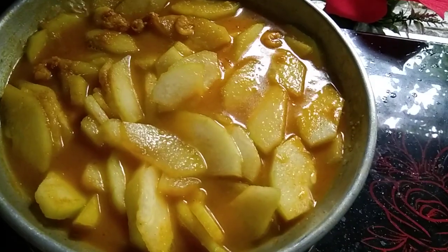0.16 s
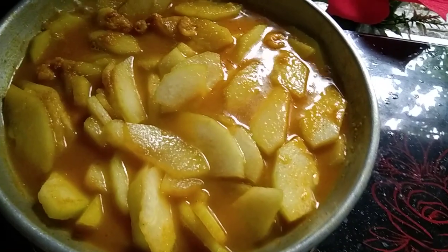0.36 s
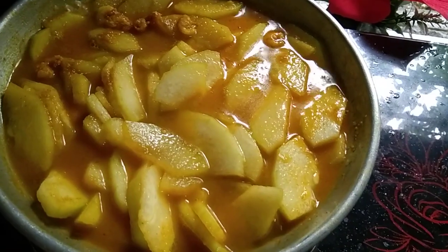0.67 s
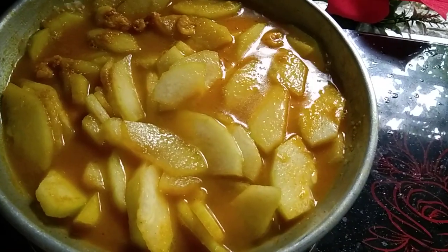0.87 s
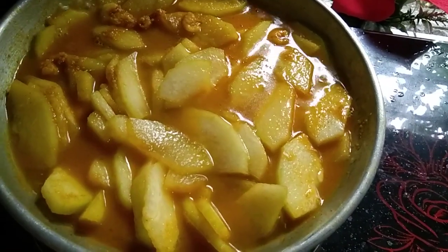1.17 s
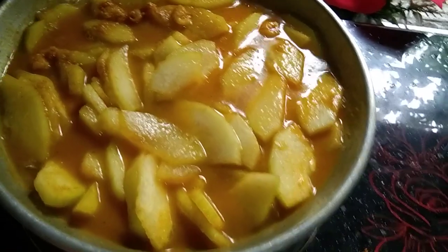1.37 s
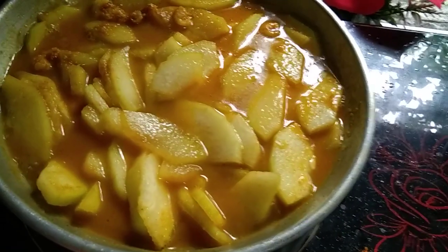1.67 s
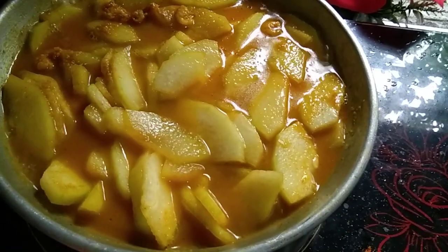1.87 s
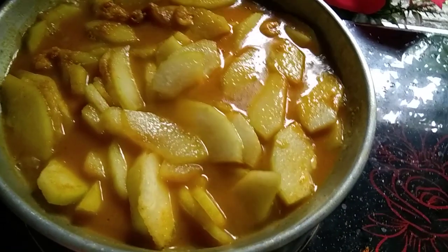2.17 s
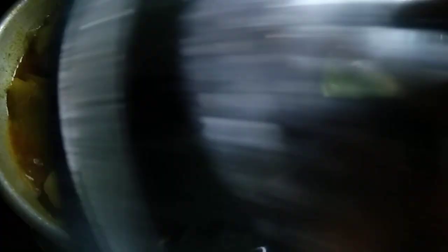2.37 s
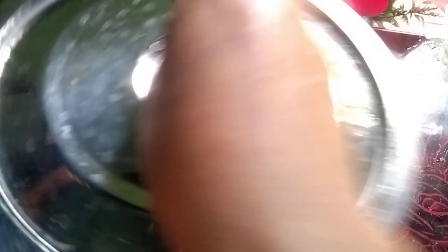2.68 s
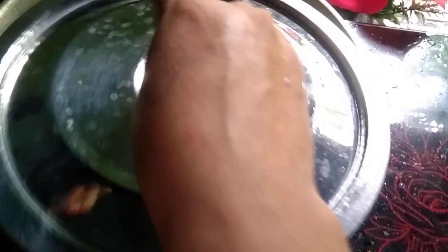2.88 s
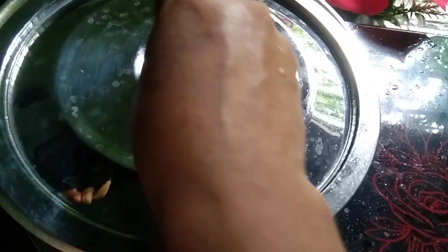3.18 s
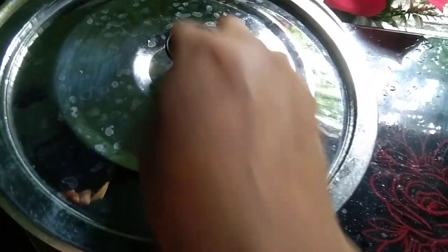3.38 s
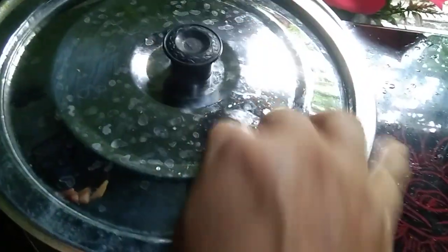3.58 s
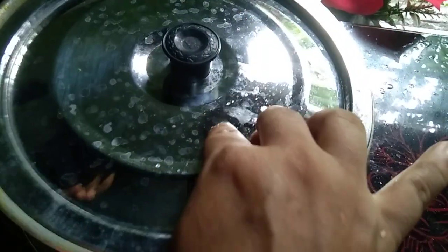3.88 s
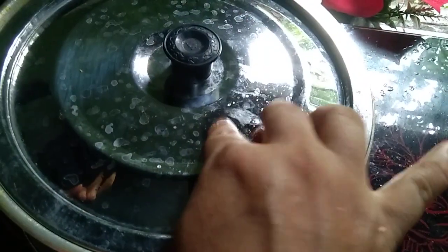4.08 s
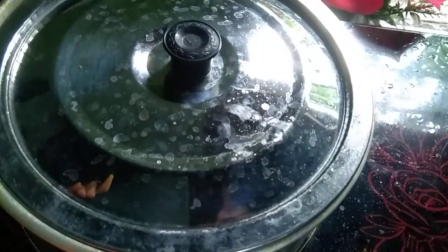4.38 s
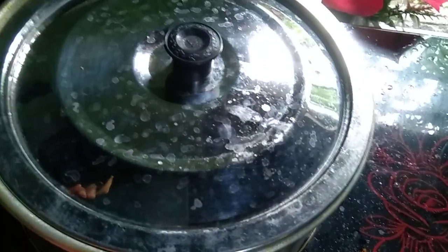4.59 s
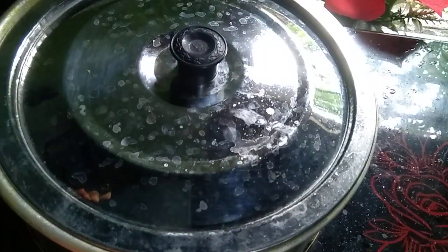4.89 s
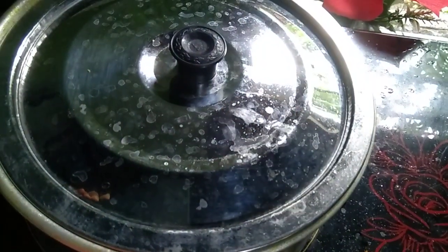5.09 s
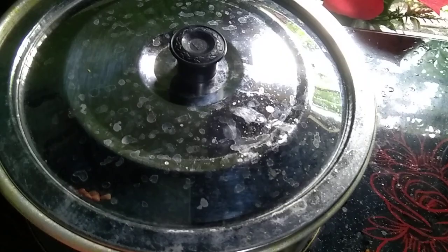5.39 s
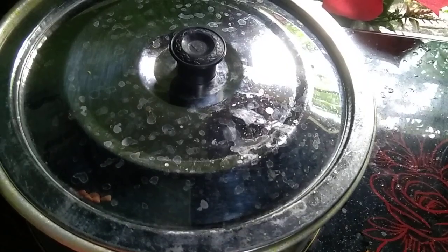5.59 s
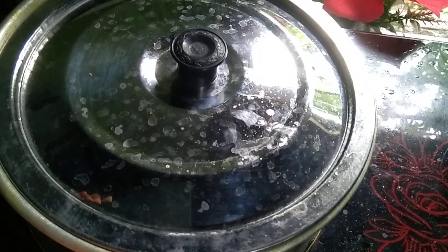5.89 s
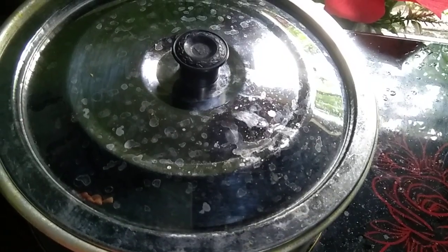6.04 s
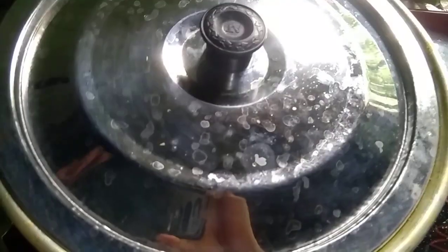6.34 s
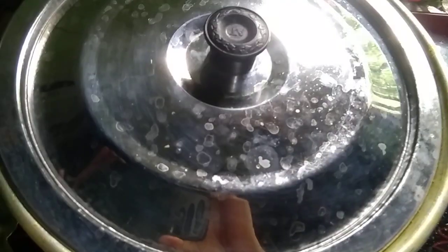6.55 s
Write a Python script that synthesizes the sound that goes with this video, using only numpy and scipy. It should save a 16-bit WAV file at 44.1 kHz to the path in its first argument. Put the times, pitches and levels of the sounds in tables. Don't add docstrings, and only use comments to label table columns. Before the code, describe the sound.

Curry simmers in an open steel pot, three spoon taps ring on the rim, then a glass lid clanks on and the bubbling turns hollow and quiet.

```python
import sys
import numpy as np
from scipy import signal
from scipy.fft import rfft, irfft
from scipy.io import wavfile
from scipy.ndimage import uniform_filter1d

SR = 44100
rng = np.random.default_rng(int(sys.argv[2]) if len(sys.argv) > 2 else 0)


def voltage_ratio(level):
    return 10 ** (np.asarray(level, float) / 20)


def transcribe(u):
    v = np.clip(np.atleast_2d(u).T, -1, 1)
    q = np.round(v * 32767).astype(np.int16)
    wavfile.write(sys.argv[1], SR, q)


N = 296352
T = np.arange(N) / SR

LID_MOVES_S = [
    2.9,
    4.0,
    6.26,
]
GATE_EDGES_HZ = [300, 1000, 3600, 6800, 15000]
# [f/Hz, width/Hz, level/dB]
OPEN_AIR = [(890, 69, -21.5), (2370, 520, 8), (4468, 200, 8), (5760, 306, 4.5), (6650, 160, -9.5),
            (7660, 890, -10), (8660, 82, -14), (9100, 170, -16.5), (10120, 470, -17)]
# [t/s, peak/dB, f/Hz]
POPS = [(0.2228, -34.5, 2500), (0.477, -25, 2900), (0.5242, -26.5, 2200), (0.6568, -35, 1220),
        (0.722, -35.5, 2360), (1.092, -25, 2600), (1.149, -32.5, 2100), (1.25, -37.5, 1960),
        (1.272, -36.5, 1980), (1.325, -43, 1360), (1.3585, -26.5, 2500), (1.51, -25, 3110),
        (1.682, -33, 2440), (1.9182, -33, 1790), (1.954, -36.5, 2590), (2.1623, -25, 2370),
        (2.2018, -35, 1820), (2.3164, -20, 2370), (2.39, -41.5, 3510), (2.56, -43.5, 3130),
        (2.7394, -37, 2690), (2.785, -40, 2050), (2.8587, -10, 2170)]
# [t/s, peak/dB, f/Hz]
SPITS = [(.035, -40, 6130), (0.107, -34, 6570), (0.135, -22, 7250), (0.2362, -23.5, 6960),
         (.505, -25, 6800), (.528, -30, 7100), (.56, -35, 6800), (0.641, -30.5, 9000), (0.734, -27, 7740),
         (.747, -33, 6500), (0.979, -23, 7560), (1.1376, -25.5, 7660), (1.1721, -44, 7700),
         (1.2284, -42, 5660), (1.254, -39.5, 5670), (1.2913, -53, 5900), (1.348, -36, 7700),
         (1.396, -45, 7900), (1.42, -33.5, 9100), (1.4509, -48, 4300), (1.3339, -28.5, 7660),
         (1.3885, -24, 7200), (1.4641, -29, 6650), (1.5194, -42.5, 5760), (1.5373, -25, 7900),
         (1.555, -44, 5900), (1.5602, -34.5, 8240), (1.6811, -27.5, 6650), (1.719, -28, 7250),
         (1.7462, -37, 7320), (1.7737, -52.5, 4730), (1.867, -27.5, 9100), (1.8829, -35, 7400),
         (1.9648, -30.5, 7280), (1.9891, -31, 5760), (2.0341, -28.5, 7770), (2.0785, -25.5, 6950),
         (2.1289, -24, 7900), (2.1663, -42, 8150), (2.177, -23, 8370), (2.1937, -39, 5850),
         (2.2282, -37.5, 5850), (2.2875, -37, 5950), (2.3145, -55, 5730), (2.3304, -35, 8100),
         (2.3722, -23.5, 7900), (2.4048, -38, 8200), (2.4324, -41, 8530), (2.4496, -23, 8200),
         (2.4746, -31.5, 7300), (2.5057, -26.5, 8700), (2.5217, -23, 7100), (2.5569, -39.5, 7650),
         (2.5809, -43, 5510), (2.6188, -40, 7640), (2.6846, -32, 7000), (2.769, -29.5, 6730),
         (2.8123, -25.5, 9100)]
# [t/s, peak/dB, f/Hz]
TAIL_SPRAY = [(1.155, -49, 11000), (1.173, -39.5, 11500), (1.197, -46.5, 11500), (1.212, -50.5, 11100)]
# [t/s, peak/dB, f/Hz]
LID_POPS = [(2.66, -51.5, 2200), (2.662, -61, 1460), (2.686, -51.5, 2210), (2.715, -69, 1460),
            (2.822, -45, 1520), (2.825, -49, 2245), (3.461, -39, 1570), (3.4914, -40, 2406),
            (3.7208, -42.5, 1344), (3.7626, -42, 1570), (3.813, -41, 1460), (3.8372, -36, 2250),
            (4.1296, -54, 2470), (4.1456, -49, 1346), (4.1654, -48.5, 1330), (4.28, -61, 2500),
            (4.3696, -52.5, 2490), (4.4257, -50, 2440), (4.4494, -49, 1930), (4.4923, -54.5, 2500),
            (4.5332, -51.5, 2464), (4.5572, -52, 2550), (4.628, -49.5, 1950), (4.6614, -41, 2480),
            (4.7884, -39.5, 2484), (4.8515, -44.5, 1930), (4.9667, -48, 1260), (4.9967, -47, 1848),
            (5.0602, -48.5, 1340), (5.08, -58, 2490), (5.28, -51.5, 2490), (5.3239, -49, 2510),
            (5.3765, -42, 2380), (5.458, -47.5, 1490), (5.5243, -48, 1265), (5.5694, -41, 2510),
            (5.6036, -40.5, 1920), (5.6317, -49, 2510), (5.7584, -50.5, 2520), (5.7894, -50.5, 1976),
            (5.9, -55, 2494), (5.9912, -47.5, 1924), (6.07, -57, 2480), (6.161, -57, 1398),
            (6.2389, -49, 1910), (6.2601, -47.5, 1470), (6.3564, -34.5, 1393), (6.4052, -55, 1350),
            (6.4472, -31, 2370), (6.477, -25.5, 1456), (6.5186, -32, 1550), (6.562, -28, 2180),
            (6.6071, -23.5, 2390)]
# [t/s, peak/dB, f/Hz]
LID_TICKS = [(3.004, -31, 4200), (3.007, -17, 8100), (3.116, -39, 4520), (3.127, -25, 8500),
             (3.177, -41, 4370), (3.289, -39, 7800), (3.253, -29.5, 6260), (3.375, -48.5, 4580),
             (3.5225, -38.5, 6540), (3.566, -38, 4850), (3.64, -42, 7840), (3.667, -38, 8200),
             (3.701, -29.5, 7880), (3.762, -44, 6150), (3.8353, -25, 5760)]
# [t/s, peak/dB, f/Hz]
SHUT_TICKS = [(4.27, -59.5, 5410), (4.352, -55.5, 5600), (4.6414, -49, 3470), (4.661, -56, 4400),
              (5.01, -55.5, 5700), (5.15, -57, 5700), (5.569, -60, 4990), (5.614, -51, 3200),
              (5.945, -60.5, 5620), (5.3657, -52, 3810), (5.5233, -56, 7500), (6.3027, -54, 4620),
              (6.3216, -42.5, 7700), (6.406, -43, 3000), (6.4523, -36, 6770), (6.6379, -42, 2400),
              (6.6609, -51, 3000), (6.6993, -54, 3550), (6.716, -60, 5960)]


def rms_one(x):
    return x / np.sqrt(np.mean(x ** 2) + 1e-20)


def band(x, low, high, order=2):
    return signal.sosfilt(signal.butter(order, [low, high], "band", fs=SR, output="sos"), x)


def low_pass(x, hz, order=2):
    return signal.sosfilt(signal.butter(order, hz, fs=SR, output="sos"), x)


def coloured(points, size, peaky_db=0):
    hz, db = np.transpose(points)
    grid = np.maximum(np.fft.rfftfreq(size, 1 / SR), 1)
    peaks = np.interp(grid / 45., np.arange(999), rng.standard_normal(999))
    peaks *= peaky_db * np.minimum(grid / 1500, 1)
    shape_db = np.interp(np.log(grid), np.log(hz), db) + peaks
    return rms_one(irfft(rfft(rng.standard_normal(size)) * voltage_ratio(shape_db), size))


def resonance(x, hz, width):
    r = np.exp(-np.pi * max(width, 20) / SR)
    feedback = [1, -2 * r * np.cos(2 * np.pi * hz / SR), r * r]
    return signal.lfilter((1 - r * r) / 2 * np.array([1, 0, -1]), feedback, x)


def double_resonance(x, hz, width):
    return resonance(resonance(x, hz, width), hz, width)


def add(out, s, sound):
    i = int(round(s * SR))
    out[i:i + len(sound)] += sound[:N - i]


def lid_state(s):
    return np.searchsorted(LID_MOVES_S, s)


def room_floor():
    # [f/Hz, level/dB per Hz]
    floor = [(15, -38), (25, -15.5), (92, 4.5), (451, -12), (887, -5), (1070, -28.5), (1440, 2.5),
             (1610, -19), (2480, -8.5), (2840, -19), (7710, -18), (16000, -34)]
    return voltage_ratio(-71.5) * coloured(floor, N)


def far_tones():
    # [t/s, level/dB, f/Hz]
    whistle = [(0, -61, 1724), (.7, -61.5, 1722), (1.619, -64.5, 1720), (1.75, -57.5, 1750),
               (1.85, -60.5, 1723), (2, -66, 1679), (2.5, -67, 1674), (2.6, -97, 1670)]
    dishes = [
        (.03, 0.18, [(860, -63.5)]),
        (1.6, 0.026, [(650, -64), (1090, -71)]),
        (2.03, 0.048, [(740, -62.5), (1380, -65), (2256, -63.5), (2740, -68)]),
        (2.07, 0.075, [(1658, -59), (2541, -56.5), (3268, -72)]),
    ]
    at, level_db, pitch = np.transpose(whistle)
    a, b = low_pass(rng.standard_normal((2, N)), 22)
    phase = 2 * np.pi * np.cumsum(np.interp(T, at, pitch)) / SR
    out = rms_one(a * np.cos(phase) + b * np.sin(phase)) * voltage_ratio(np.interp(T, at, level_db))
    for s, swell_s, lines in dishes:
        t, white = T[:SR] / swell_s, rng.standard_normal(2 * SR)
        sung = sum(voltage_ratio(db) * rms_one(double_resonance(white, hz, 55)[SR:]) for hz, db in lines)
        add(out, s, sung * t * np.exp(1 - t))
    return out


def wall_ring(x, width_hz, count):
    pitches = np.exp(rng.uniform(np.log(2800), np.log(15000), count))
    return rms_one(sum(resonance(x, hz, width_hz) for hz in pitches))


def pot_air(per_s, spread_db, hiss_db, valley_db):
    # [f/Hz, width/Hz, level/dB]
    ajar_air = [(656, 170, -6), (760, 83, -3), (1395, 120, 0), (2120, 120, -2), (3250, 200, -12),
                (4500, 180, -7.5), (5760, 140, -3.5), (7880, 940, -14), (10480, 420, -21.5)]
    shut_air = [(575, 138, 9.5), (1240, 218, -6), (1930, 150, -4), (2510, 91, -1), (3200, 136, -17.5),
                (3730, 46, -25), (5300, 313, -17), (7900, 550, -5.5), (10100, 102, 10)]
    lifted_air = [(313, 184, -6), (521, 92, -0.5), (739, 107, 2), (1460, 190, 0.5), (2390, 294, -2),
                  (3000, 280, -19), (3870, 130, -7), (4500, 140, -10.5)]
    crackle_levels = [
        -1.5,
        -3,
        -3,
        0.5,
    ]
    strength_db = spread_db * np.minimum(rng.exponential(1, N), 4)
    grains = rms_one((rng.random(N) < per_s / SR) * voltage_ratio(strength_db) * rng.choice([-1, 1], N))
    hiss = voltage_ratio(hiss_db) * rng.standard_normal(N)
    hiss = hiss + 0.75 * wall_ring(grains + hiss, width_hz=45, count=40)
    muffled = low_pass(grains, 3800, order=3)
    states = [OPEN_AIR, ajar_air, shut_air, lifted_air]
    crackles = [grains, grains, muffled, muffled]
    moves = [0, *[int(s * SR) for s in LID_MOVES_S], N]
    out = np.zeros(N)
    for peaks, crackle, crackle_db, a, b in zip(states, crackles, crackle_levels, moves, moves[1:]):
        x = voltage_ratio(crackle_db) * crackle[a:b] + hiss[a:b]
        air = voltage_ratio(valley_db) * x
        for hz, width, db in peaks:
            air = air + voltage_ratio(db) * double_resonance(x, hz, 1.5 * width)
        for low, high in zip(GATE_EDGES_HZ, GATE_EDGES_HZ[1:]):
            out[a:b] += rms_one(band(air, low, high, order=3))
    return out


def suppressor(air, gulps, spray, release_s, shut_db, chance_per_s, favour):
    # [0.3-1 kHz/dB, 1-3.6 kHz/dB, 3.6-6.8 kHz/dB, 6.8-15 kHz/dB]
    sizzle_db = [
        (-83.5, -70, -63, -55),
        (-62.5, -61.5, -67.5, -68),
        (-62.5, -70, -71.5, -75.5),
        (-42, -42.5, -58, -62),
    ]
    # [t/s, level/dB]
    boil = [(0, -3), (.12, 0), (.3, 13), (.62, -14), (1.0, 16), (1.5, -6), (1.8, -8.5), (2.2, 15),
            (2.5, -1.5), (2.85, 0), (3.53, 3), (4.7, 2.5), (5.2, 3), (5.65, 5.5), (6.2, -2), (6.28, -4.5),
            (6.4, 4), (6.52, 2), (6.66, -1.5), (6.72, 1.5)]
    # [t/s, f/Hz]
    steam_hz = [(6.26, 8650), (6.42, 8300), (6.53, 8450), (6.59, 11500), (6.72, 12500)]
    # [t/s, level/dB, centre f/Hz]
    surges = [
        (5.524, -45, 1500),
        (4.632, -52, 2300),
        (6.26, -54, 8000),
        (5.94, -66, 13000),
    ]
    # [t/s, level/dB, centre f/Hz]
    puffs = [
        (6.3, -54, 5600),
        (6.42, -51, 6550),
        (6.65, -38.5, 4950),
        (6.68, -57, 5300),
    ]
    chance_db = [3.5, 6.5, -2.5, 5]
    rest_db = [-20, -12, -13.5, -6.5]
    favour_share = [0.59, 1, 1, 0.27]
    # (events, opening dB, reach octaves)
    bursts = [(POPS, -16, .6), (SPITS + LID_TICKS, -21, .35), (surges, -4, 1.4), (LID_POPS, -11, .4),
              (gulps, -9, .4), (spray, -8, .3), (SHUT_TICKS, -8, .3), (TAIL_SPRAY, -10, .3), (puffs, -4, .3)]
    step = 64
    t = T[::step]
    lid = lid_state(t)
    levels = np.transpose(sizzle_db)[:, lid] + np.interp(t, *np.transpose(boil))
    steam_centre = np.interp(t, *np.transpose(steam_hz))
    edges, out = np.geomspace(300, 15000, 25), np.zeros(N)
    fade = np.exp(-step / SR / release_s)
    for low, high in zip(edges, edges[1:]):
        hz = np.sqrt(low * high)
        steam_db = 2.5 - np.minimum(45 * np.log2(hz / steam_centre) ** 2, 12)
        wide = np.searchsorted(GATE_EDGES_HZ, hz) - 1
        rest = voltage_ratio(levels[wide] + steam_db * (lid == 3) * (hz > 5500))
        by_chance = rng.random(len(t)) < chance_per_s * step / SR
        luck_db = np.clip(4 * rng.standard_normal(len(t)), -9, 5)
        kicks = np.minimum(rest, voltage_ratio(-58)) * by_chance * voltage_ratio(np.take(chance_db, lid) + luck_db)
        for events, open_db, reach_octaves in bursts:
            at, db, burst_hz = np.transpose(events)
            near_db = -6 * (np.log2(burst_hz / hz) / reach_octaves) ** 4
            np.add.at(kicks, (at * SR / step).astype(int), voltage_ratio(np.minimum(db, -30) + open_db + near_db))
        gate = voltage_ratio(np.take(rest_db, lid)) * rest + signal.lfilter([1], [1, -fade], kicks)
        gate *= gate ** 2 / (gate ** 2 + voltage_ratio(shut_db) ** 2)
        heard = band(air, low, high, order=3)
        quick = uniform_filter1d(np.abs(heard), size=640)[::step]
        liveliness = quick / (uniform_filter1d(quick, size=160) + 1e-9)
        gate *= liveliness ** (favour * np.take(favour_share, lid))
        out += np.interp(T, t, gate) * heard
    return out


def bubbles(events, cycles, spread):
    out, t = np.zeros(N), T[:int(.04 * SR)]
    for (s, db, hz), white in zip(events, rng.standard_normal((len(events), len(t)))):
        puff = (np.sin(2 * np.pi * hz * t) + 0.5 * white) * t * np.exp(-t * hz / cycles)
        snap = band(puff, hz / spread, min(hz * spread, .45 * SR), order=3)
        add(out, s, voltage_ratio(min(db, -20)) * snap / np.abs(snap).max())
    return out


def through_pot(x, direct):
    x_safe = x + 1e-18
    rung = sum(voltage_ratio(db / 2) * double_resonance(x_safe, hz, 2 * width) for hz, width, db in OPEN_AIR[2:])
    return direct * x + 2.43 * rung


def spray_events():
    # [t/s, peak/dB]
    droplets = [(0.179, -41.5), (0.2424, -32), (0.5784, -37.5), (0.6767, -35.5), (1.249, -41), (1.292, -37),
                (1.336, -42), (1.4724, -42.5), (1.5217, -37.5), (1.681, -39.5), (1.8177, -46.5),
                (1.8575, -40), (1.8668, -42), (1.8833, -37), (1.9332, -50), (1.9634, -31.5),
                (2.0344, -32.5), (2.157, -35), (2.1761, -36), (2.192, -36.5), (2.243, -45), (2.3233, -35.5),
                (2.379, -38), (2.4031, -45), (2.4347, -32), (2.4769, -44), (2.5867, -50), (2.6193, -38.5),
                (2.7044, -41.5), (2.7907, -41.5)]
    return [(s, db, 10800 * np.exp(0.098 * rng.standard_normal())) for s, db in droplets]


def gulp_events():
    # [t/s, peak/dB]
    swallows = [(2.615, -65), (2.685, -64), (2.82, -54.5), (2.858, -44.5), (2.88, -44.5), (3.094, -39.5),
                (3.219, -42.5), (3.437, -47), (3.46, -46), (3.649, -46.5), (3.715, -45), (4.138, -43),
                (4.186, -58.5), (4.239, -46), (4.32, -70), (4.369, -54.5), (4.527, -60), (4.606, -54.5),
                (4.732, -58), (4.85, -42.5), (4.895, -49), (5.178, -52), (5.285, -47.5), (5.353, -51.5),
                (5.525, -48), (5.571, -40.5), (5.61, -46), (5.718, -53.5), (5.753, -47), (5.863, -49.5),
                (5.908, -51), (5.943, -51.5), (6.144, -57.5), (6.238, -47), (6.268, -43), (6.287, -45),
                (6.381, -36), (6.445, -47), (6.5, -38), (6.56, -39.5), (6.603, -43), (6.623, -35.5)]
    air_hz = [
        800,
        768,
        512,
        639,
    ]
    return [(s, db, air_hz[lid_state(s)]) for s, db in swallows]


def boiling_bursts(gulps, spray):
    out = through_pot(bubbles(SPITS + LID_TICKS, cycles=1.62, spread=1.31), direct=0.08)
    out += bubbles(spray, cycles=3.5, spread=1.5)
    out += band(bubbles(POPS, cycles=0.92, spread=1.88), 1290, 3100)
    out += bubbles(TAIL_SPRAY, cycles=2.5, spread=1.35)
    out += band(bubbles(gulps, cycles=3.05, spread=7.3), 180, 1000)
    out += bubbles(LID_POPS, cycles=3.27, spread=1.16)
    return out + bubbles(SHUT_TICKS, cycles=6.8, spread=1.34)


def overtones(points, count, spread_db):
    hz, db = np.transpose(points)
    pitch = np.exp(rng.uniform(np.log(1200), np.log(15500), count)).astype(int)
    lines = np.zeros(SR // 2 + 1, complex)
    strength_db = np.interp(np.log(pitch), np.log(hz), db) + 10 * np.log10(pitch)
    strength_db += spread_db * np.clip(rng.standard_normal(count), -3, 1.3)
    lines[pitch] = voltage_ratio(strength_db) * np.exp(2j * np.pi * rng.random(count))
    return rms_one(irfft(lines, SR))


def blow(events, modes, colour, ring_db, overtone_db, damped_s=9):
    out, t = np.zeros(N), T[:SR]
    hz, db, t60 = np.transpose(modes)[:, :, None]
    rise_s = np.where(hz < 1100, 4.0 / hz, .0006)
    short = overtones(colour, count=70, spread_db=1.5)
    lasting = overtones(colour, count=50, spread_db=0.0)
    for s, peak_db, clatter_db, clatter_t60 in events:
        uneven_db = rng.normal(0, 1.5, hz.shape)
        strength = voltage_ratio(db + ring_db + uneven_db - 60 * t / np.minimum(t60, .6))
        tones = np.sin(2 * np.pi * (hz * t + rng.random(hz.shape)))
        rings = np.sum(strength * np.minimum(t / rise_s, 1) * tones, axis=0)
        rings *= voltage_ratio(-900 * np.maximum(t - damped_s, 0))
        noise = coloured(colour, SR, peaky_db=5)
        bass = low_pass(noise, 700)
        decay_db = -60 * t / clatter_t60
        clatter = 0.67 * (noise - bass) * voltage_ratio(decay_db) * (1 + 0.57 * np.exp(-t / 0.015))
        clatter += bass * voltage_ratio(decay_db / 0.97) * np.minimum(t / 0.026, 1)
        turn = rng.integers(SR)
        clatter += voltage_ratio(overtone_db) * np.roll(short, turn) * voltage_ratio(decay_db / .6)
        clatter += voltage_ratio(overtone_db - 4.5) * np.roll(lasting, turn) * voltage_ratio(decay_db / 1.05)
        add(out, s, voltage_ratio(peak_db) * (rings + voltage_ratio(clatter_db) * clatter))
    return out


def spoon_taps():
    # [t/s, peak/dB, clatter/dB re peak, clatter t60/s]
    tap_1 = [
        (0.314, -5.5, -5, 0.31),
    ]
    tap_2 = [
        (0.788, 0.5, -9, 0.21),
        (0.827, -6.5, -14, 0.39),
    ]
    tap_3 = [
        (1.002, -3, -9.5, 0.21),
        (1.02, -7.5, -13, 0.4),
    ]
    # [f/Hz, level/dB, t60/s]
    ring_1 = [(298, -15, 0.19), (612, -22, 0.16), (2132, -3, .14), (2420, -8.5, 0.22), (2510, -12, 0.27),
              (3628, -22, 0.2), (3860, -18, 0.24), (3850, -15.5, .22), (5777, -14.5, 0.23),
              (5876, -12.5, 0.21), (7280, -14.5, .23), (6986, -14.5, .21), (7250, 8, .05), (9900, -21, 0.2)]
    ring_2 = [(212, -18, 0.2), (275, -11, 0.15), (650, -15, .15), (1087, -17, 0.2), (1669, -18, 0.25),
              (2293, -10, 0.2), (2992, 4.5, .08), (3128, -15, 0.24), (4533, -16, .2), (5254, -8, .14),
              (5900, -2, .06), (6465, -16, .25), (7014, -14, .17), (7780, -9, .2)]
    ring_3 = [(308, -33, 0.22), (676, -26.5, 0.16), (2060, -13, 0.096), (2363, -15.5, 0.18),
              (3000, -3, 0.13), (3300, -6, 0.098), (3720, -12.5, 0.2), (4770, -20, 0.22), (5900, 0.5, 0.04),
              (6557, -8.5, 0.11), (7078, -6, 0.1), (2940, -15.5, .2), (7950, -8, 0.13), (8650, -19, .16)]
    # [f/Hz, level/dB per Hz]
    first_colour = [(60, -35.5), (130, -25.5), (300, -12.5), (620, -14), (1500, -19), (2350, -6.5),
                    (3000, -14), (3850, -3.5), (4800, -11.5), (7000, -6.5), (16000, -38)]
    later_colour = [(76, -51.5), (130, -25.5), (297, -8), (462, -17.5), (638, -6.5), (1080, -10),
                    (1290, -17), (2720, -9), (3070, -3.5), (3460, -10), (7910, -9.5), (16000, -41)]
    out = blow(tap_1, ring_1, first_colour, ring_db=-4.0, overtone_db=-11.5)
    out += blow(tap_2, ring_2, later_colour, ring_db=-9.0, overtone_db=-13.0)
    return out + blow(tap_3, ring_3, later_colour, ring_db=-4.5, overtone_db=-5.5)


def lid_blows():
    # [t/s, peak/dB, clatter/dB re peak, clatter t60/s]
    lands = [
        (2.898, -1.5, -17.5, 0.34),
    ]
    seats = [
        (2.96, -6, -10.5, 0.18),
        (3.005, -16.5, -9.5, 0.35),
        (3.117, -34.5, -6, 0.73),
        (3.249, -36.5, -7.5, 0.27),
    ]
    nudge = [
        (3.834, -30, -8, 0.39),
    ]
    press = [
        (3.951, -20.5, -12, 0.25),
    ]
    # [f/Hz, level/dB, t60/s]
    free_modes = [(739, -12, .04), (1300, -20, .5), (1558, -0.5, 0.025), (1655, -14, .4), (2174, -17, .5),
                  (2250, -13, 0.67), (2580, -16, .4), (2775, -8, 0.1), (3671, -13, .6), (4070, -6, 0.56),
                  (5114, -10, .17), (5792, -12, 0.14), (6382, -4, .3), (8080, -12, 0.17)]
    seated_modes = [(640, 0, .025), (1303, -21, .55), (1658, -18, .45), (2175, -13, .56), (2310, -17, .5),
                    (2435, -16, .5), (2503, -5, .22), (2746, -10, .2), (2995, -17, .47), (3670, -20, .55),
                    (6261, -18, .4), (3250, -20, .5), (7650, -24, .5), (1960, -22, .4)]
    nudge_modes = [(2220, -1, 0.59), (6160, 3, 0.089), (7900, 3.5, 0.3), (10530, 2, 0.11),
                   (11600, 1, 0.091)]
    press_modes = [(282, -9, .3), (600, -4, .06), (2300, -6, .12)]
    # [f/Hz, level/dB per Hz]
    landing_colour = [(59, -67.5), (100, -25), (595, -6), (1680, -12.5), (1830, -20.5), (2520, 3.5),
                      (3470, -12), (6420, -5), (16000, -32)]
    nudge_colour = [(180, -69), (300, -38), (689, 5), (1810, -14), (2250, -5.5), (7950, -5), (16000, -22.5)]
    press_colour = [(80, -3.5), (150, -9), (280, -5.5), (600, 0.5), (1010, -20.5), (2200, -12.5),
                    (4500, -24), (8000, -22), (16000, -49)]
    out = blow(lands, free_modes, landing_colour, ring_db=-9.5, overtone_db=0.5, damped_s=.058)
    out += blow(seats, seated_modes, landing_colour, ring_db=-6.0, overtone_db=-1.0)
    out += blow(nudge, nudge_modes, nudge_colour, ring_db=-9.0, overtone_db=2.5)
    out += blow(press, press_modes, press_colour, ring_db=-8.0, overtone_db=-11.0)
    return signal.sosfilt(signal.butter(2, 110, "high", fs=SR, output="sos"), out)


def rim_whine():
    tone = rms_one(resonance(rng.standard_normal(N), 10000, 120))
    return voltage_ratio(-88.5) * tone * (lid_state(T) == 2)


def hand_rumble():
    # [t/s, level/dB]
    handling = [
        (6.25, -100),
        (6.3, -67.5),
        (6.55, -66.5),
        (6.66, -72),
        (6.72, -69),
    ]
    return voltage_ratio(np.interp(T, *np.transpose(handling))) * rms_one(band(rng.standard_normal(N), 90, 380))


def scene():
    room = room_floor() + far_tones()
    air = pot_air(per_s=640, spread_db=5.0, hiss_db=-9.0, valley_db=-24.0)
    gulps, spray = gulp_events(), spray_events()
    pot = suppressor(air, gulps, spray, release_s=0.041, shut_db=-75.0, chance_per_s=7, favour=0.47)
    pot += boiling_bursts(gulps, spray)
    blows = spoon_taps() + lid_blows()
    return (room + pot + blows + rim_whine() + hand_rumble())[None]


def roll_off(x):
    return signal.sosfilt(signal.butter(12, 16490, fs=SR, output="sos"), x)


def record(dry):
    level_db = 20 * np.log10(np.abs(dry[0]) + 1e-9)
    release_db = 250 * T
    held_db = np.maximum.accumulate(level_db + release_db) - release_db
    gain = uniform_filter1d(voltage_ratio(-.8 * np.maximum(held_db + 5.5, 0)), size=61, origin=-30)
    mix = signal.sosfilt(signal.cheby2(8, 22, 15900, fs=SR, output="sos"), dry * gain)
    return roll_off(mix)


dry = scene()
out = record(dry)
transcribe(out)
```